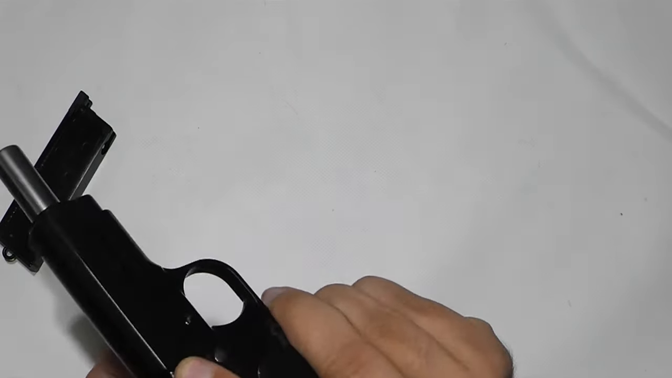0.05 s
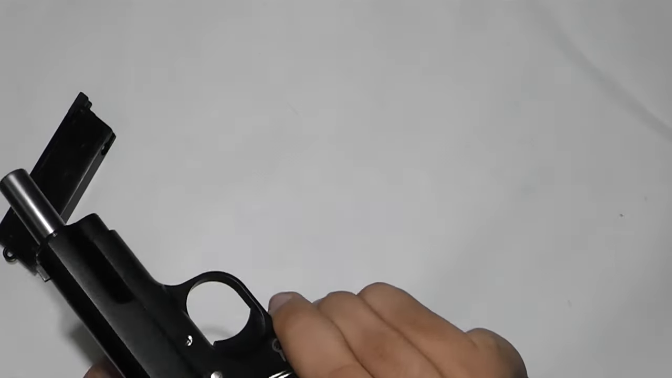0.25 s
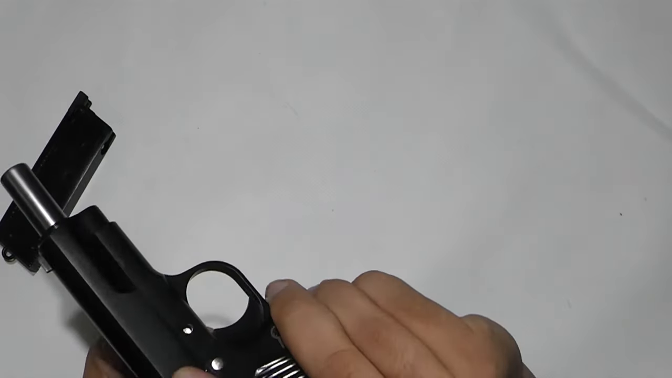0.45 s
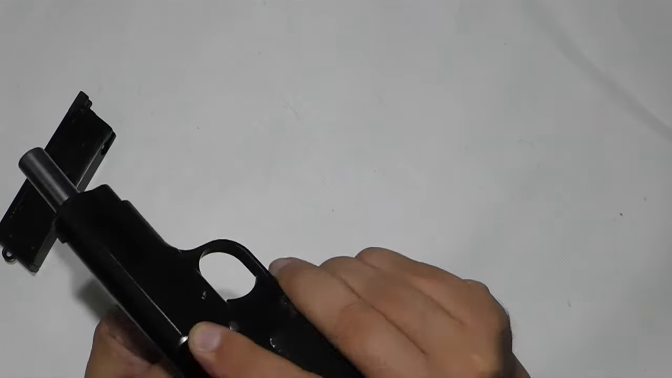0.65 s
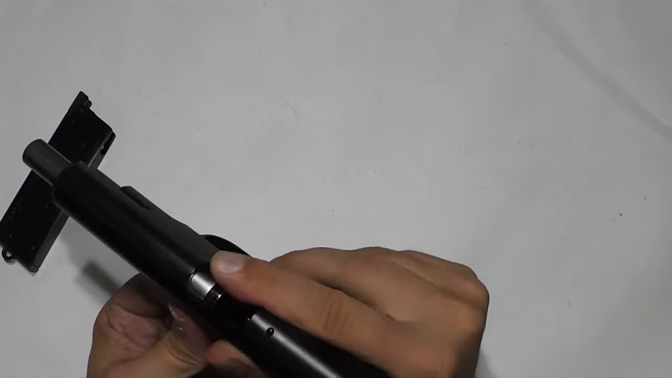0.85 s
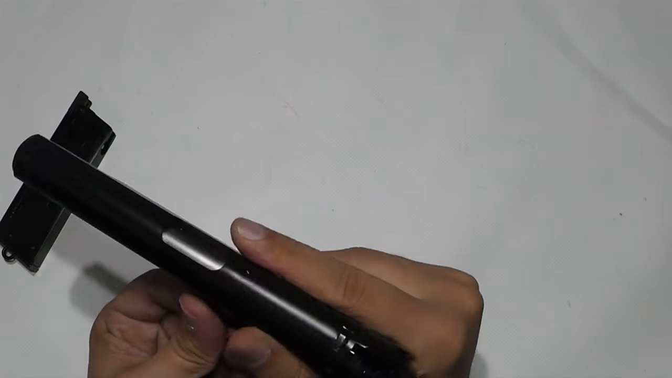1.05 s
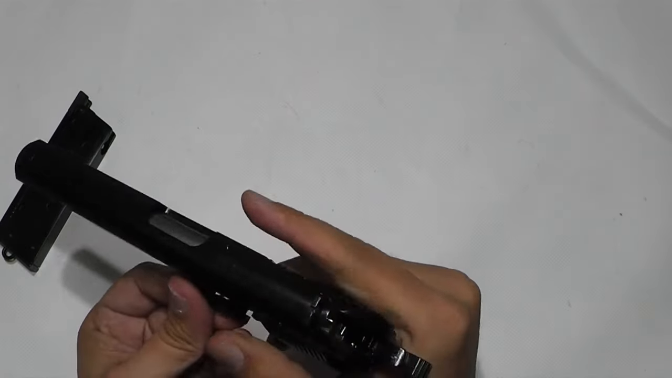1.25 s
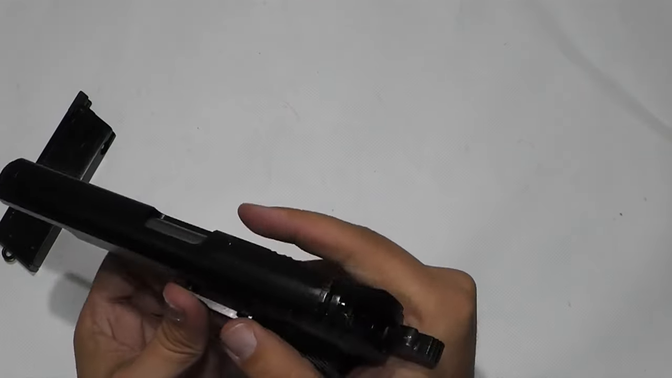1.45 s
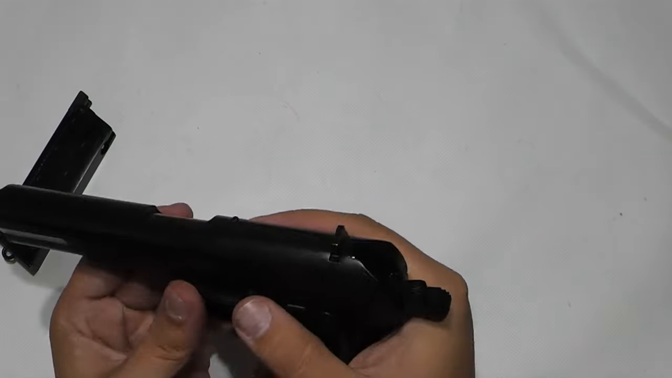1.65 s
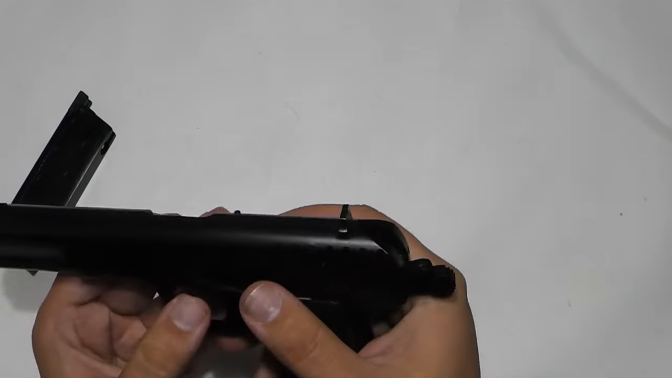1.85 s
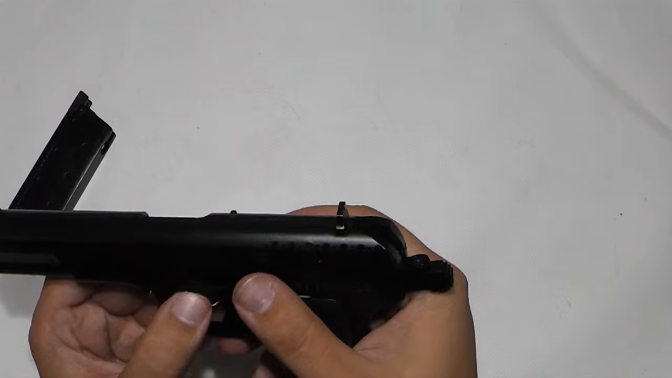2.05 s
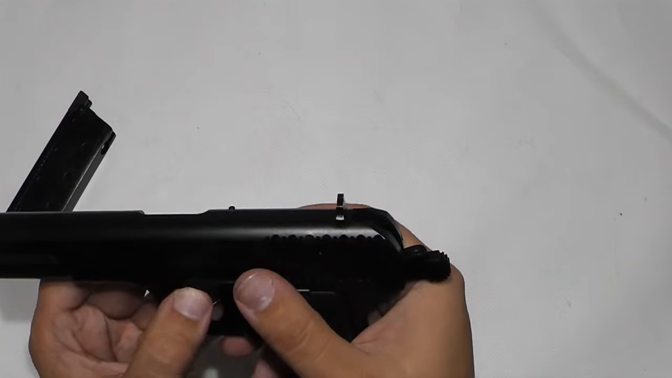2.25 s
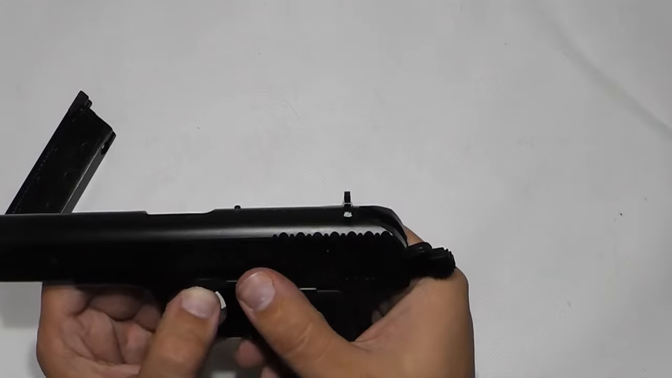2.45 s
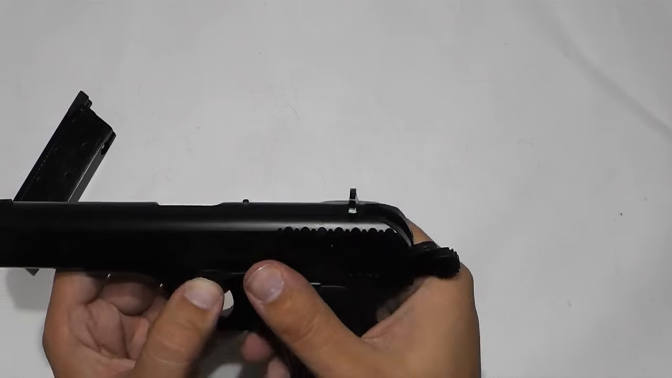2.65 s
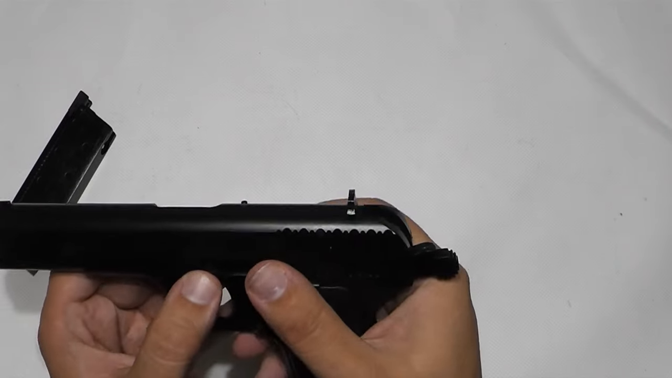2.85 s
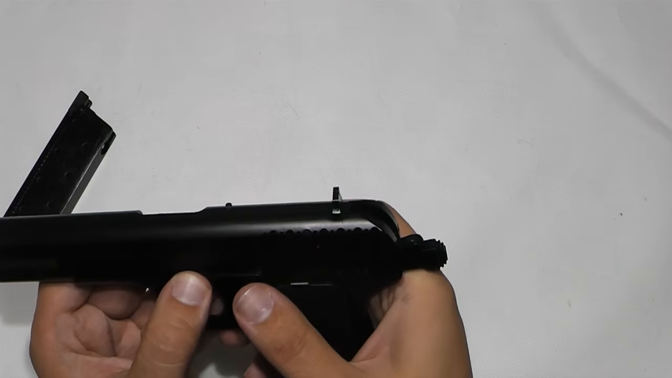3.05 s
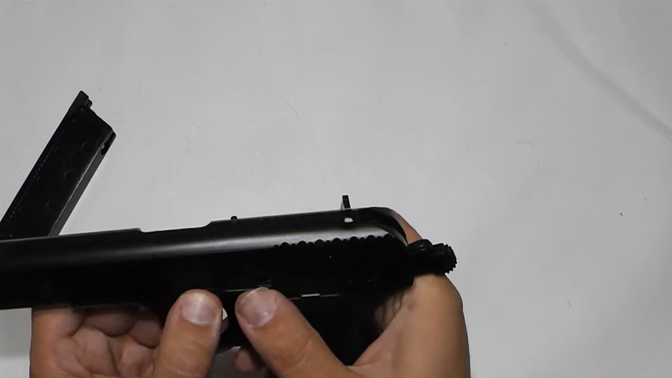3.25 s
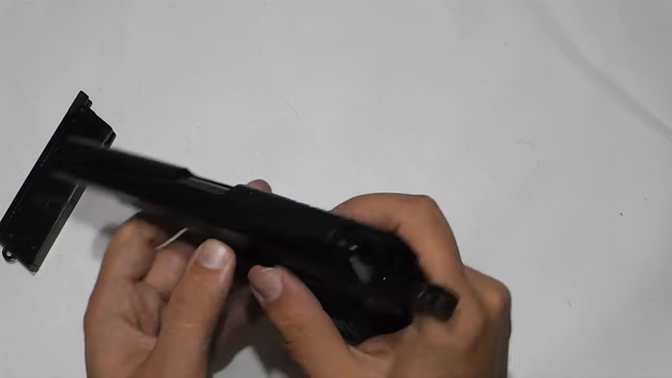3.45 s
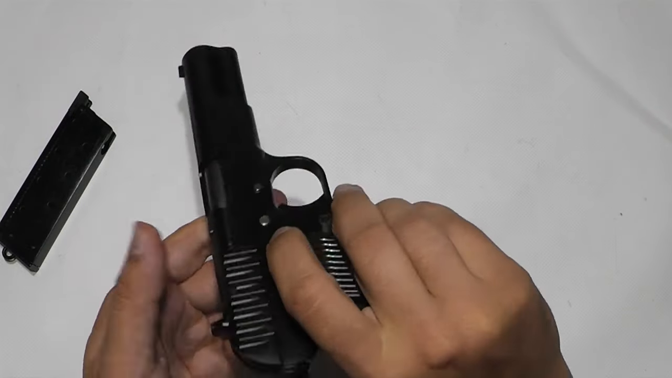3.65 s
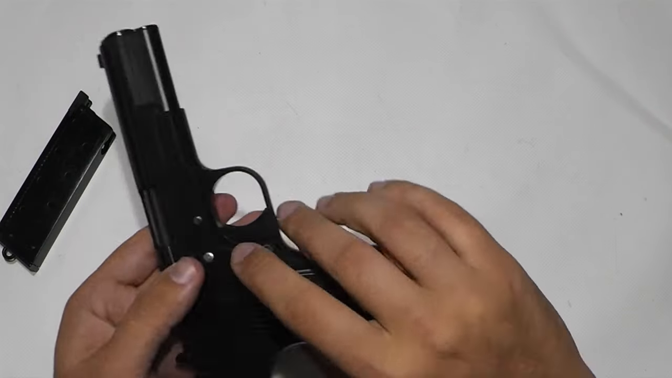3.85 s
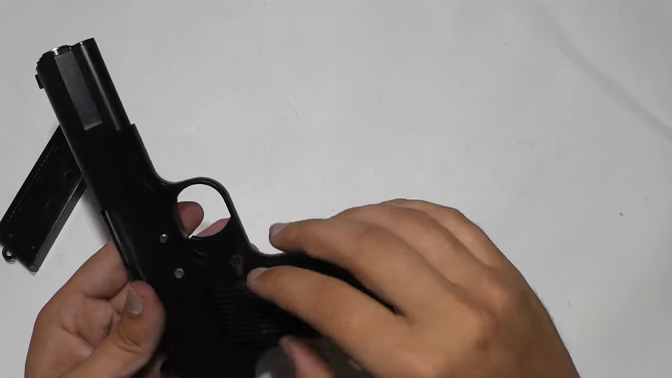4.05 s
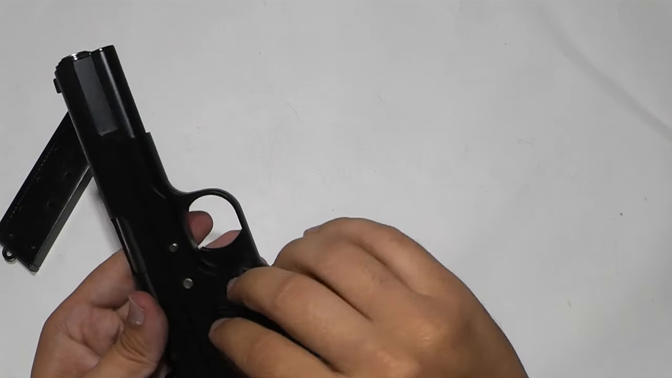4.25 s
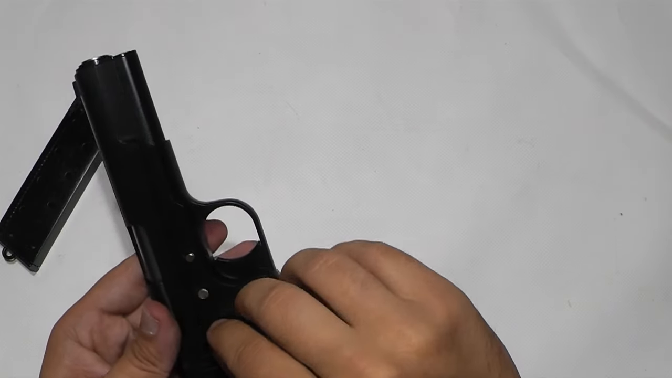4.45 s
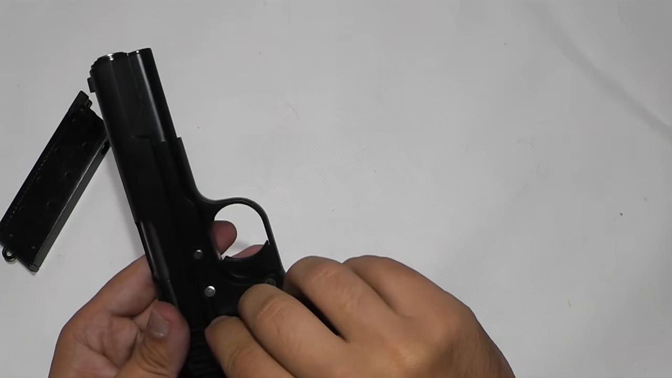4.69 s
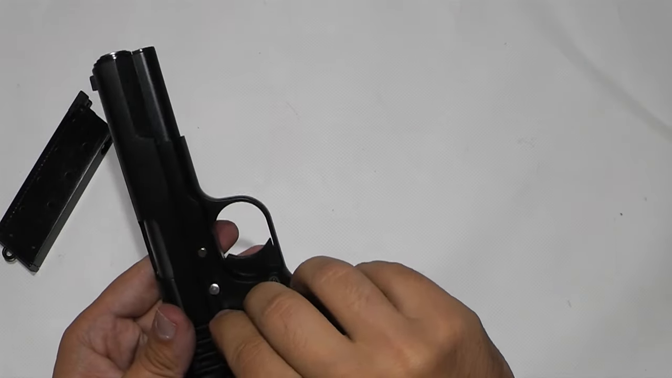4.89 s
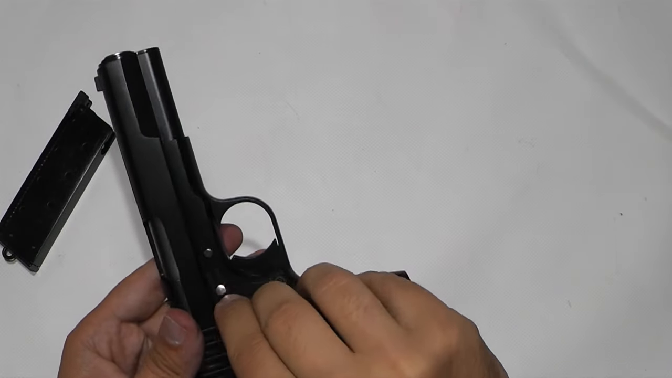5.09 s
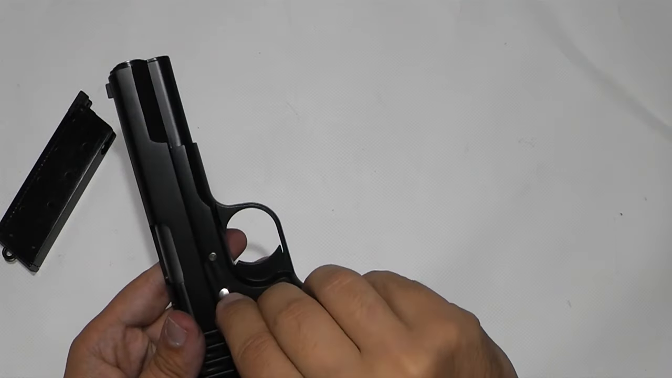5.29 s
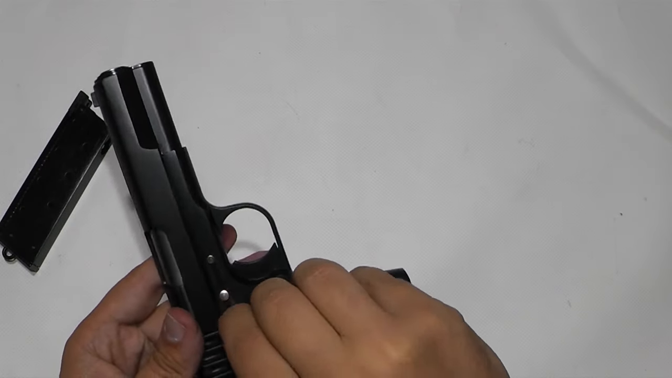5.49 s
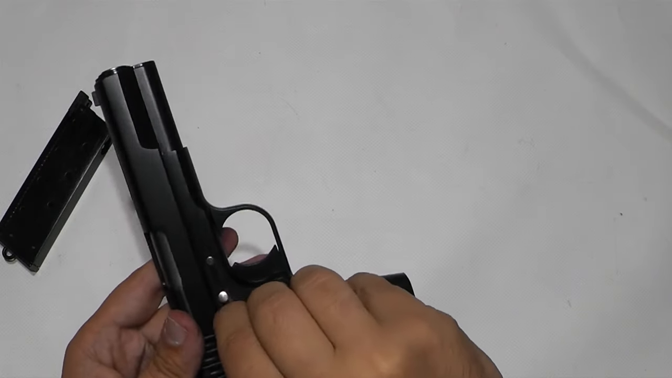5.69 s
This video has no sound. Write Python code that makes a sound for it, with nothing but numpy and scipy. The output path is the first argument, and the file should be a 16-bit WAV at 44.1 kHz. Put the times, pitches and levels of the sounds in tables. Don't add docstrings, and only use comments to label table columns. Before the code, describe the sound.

Hands work steel gun parts in a quiet small room, with ticks, a ringing table knock, two rattling slams, faint scrapes and a last snap.

```python
import sys
import numpy as np
from scipy import signal
from scipy.fft import rfft, irfft
from scipy.io import wavfile
from scipy.ndimage import uniform_filter1d

SR = 44100
rng = np.random.default_rng(int(sys.argv[2]) if len(sys.argv) > 2 else 0)


def transcribe(signal):
    frames = np.atleast_2d(signal).T
    limited = np.clip(frames, -1, 1)
    pcm = np.round(limited * 32767).astype(np.int16)
    wavfile.write(sys.argv[1], SR, pcm)


def volts_from_decibels(level):
    exponent = np.asarray(level, float) / 20
    return 10 ** exponent


N = 252693


def evened(x):
    return x / np.sqrt(np.mean(x ** 2) + 1e-20)


def peaked(x):
    return x / abs(x).max()


def read(points, hz):
    f, value = np.transpose(points)
    return np.interp(np.log(hz + 1), np.log(f + 1), value)


def add(mix, s, sound):
    part = mix[..., round(s * SR):][..., :sound.shape[-1]]
    part += sound[..., :part.shape[-1]]


def resonate(x, hz, width_hz):
    turn = np.exp(2j * np.pi * hz * np.arange(x.shape[-1]) / SR)
    r = np.exp(-np.pi * width_hz / SR)
    return 2 * (turn * signal.lfilter([1 - r], [1, -r], x / turn)).real


def ring(modes, shorten, size, apart):
    t = np.arange(size) / SR
    spread = rng.standard_normal((len(modes), 2, 1))
    out = np.zeros((2, size))
    for (hz, db, t60), v in zip(modes, spread):
        fading = volts_from_decibels(db + 0.83 * v - 60 * t / (t60 * shorten))
        out += fading * np.sin(2 * np.pi * hz * t + apart * v)
    return out * np.minimum(t / 0.00048, 1)


def shaken(colour, alike, size):
    a, b = rng.standard_normal((2, size))
    pair = np.array([a + alike * b, b + alike * a])
    return evened(irfft(rfft(pair) * volts_from_decibels(read(colour, np.fft.rfftfreq(size, 1 / SR))), size))


# pitch in Hz, likeness (1 is the same).
SAME = [(60, 0.94), (130, 0.98), (290, 0.38), (640, 0.015), (1400, 0.52), (3100, 0), (7000, 0.047)]


def hiss(colour, patchy_db, same=SAME, size=512):
    frames = N // (size // 4) + 5
    hz = np.fft.rfftfreq(size, 1 / SR)
    a, b, c, d, patches = rng.standard_normal((frames, len(hz), 5)).astype(np.float32).T
    patches = uniform_filter1d(patches, size=7, axis=0)
    patches = evened(uniform_filter1d(patches, size=8, axis=1))
    like = np.clip(read(same, hz), -1, 1)[:, None]
    left = a + 1j * b
    right = like * left + np.sqrt(1 - like ** 2) * (c + 1j * d)
    z = np.array([left, right]) * volts_from_decibels(read(colour, hz)[:, None] + patchy_db * patches)
    return evened(signal.istft(z, nperseg=size, noverlap=3 * size // 4)[1][:, :N])


# pitch in Hz, level in dB per Hz.
HUM = [(8.8, -37), (15, -10.5), (32, -9), (54, 2), (70, 3.5), (80, -8.5), (110, -4.5), (129, -20),
       (170, -23), (220, -50.5), (370, -120)]
# pitch in Hz, width in Hz, level in dB.
WHINES = [(1076, 1.4, -74), (7130, 13, -99), (8700, 20, -100.5)]
# pitch in Hz, level in dB per Hz.
AIR = [(2000, -34), (3400, -11.5), (5450, 7.5), (6410, -9), (7330, -5), (9180, -16), (11200, -16.5),
       (13000, -26.5)]


def room_noise():
    t = np.arange(N) / SR
    out = volts_from_decibels(-63) * hiss(HUM, 1.5, size=4096)
    for hz, width_hz, db in WHINES:
        waver = evened(resonate(rng.standard_normal(N), hz, width_hz))
        out += volts_from_decibels(db) * evened(np.sin(2 * np.pi * hz * t) + 0.5 * waver)
    return out + volts_from_decibels(-85.5) * hiss(AIR, 1.4, size=256)


# time in seconds, rustle
# level in dB.
RUSTLE = [(0.0, -77.5), (0.3, -81.5), (0.46, -65.5), (0.72, -68.5), (0.91, -69), (1.12, -75.5), (1.35, -75),
          (1.52, -88.5), (1.98, -79), (2.49, -87.5), (3.08, -82.5), (3.22, -72.5), (3.38, -83), (3.69, -76),
          (3.95, -78.5), (4.4, -89), (5.2, -85.5), (5.4, -80.5)]
# pitch in Hz, level in dB per Hz.
RUSTLE_COLOUR = [(2120, -42), (3600, -13), (4090, 1.5), (4890, -4.5), (5290, -2), (6090, -1), (7360, -6),
                 (10000, -4), (14200, -9.5), (15500, -14)]
# pitch in Hz, level in dB per Hz.
RUB_COLOUR = [(82, -32.5), (140, -18), (235, 0.5), (269, -5), (338, -4), (479, -6.5), (776, -5), (1100, -5),
              (1160, -4.5), (1520, -8.5), (1780, -6.5), (2220, -14), (2500, -37.5), (3250, -70.5),
              (5500, -120)]


def hands():
    t = np.arange(N) / SR
    busy_db = np.interp(t, *np.transpose(RUSTLE))
    flicker_db = 0.63 * evened(uniform_filter1d(rng.standard_normal(N), size=300))
    rustle = volts_from_decibels(busy_db + 1.9 + flicker_db) * hiss(RUSTLE_COLOUR, 1.3)
    sleeve_s, sleeve_width_s, sleeve_db = 4.44, 0.52, 4.5
    swell_db = sleeve_db * np.exp(-((t - sleeve_s) / sleeve_width_s) ** 2)
    rub_db = -65 + 0.18 * (busy_db + 74.5) + swell_db
    return rustle + volts_from_decibels(rub_db + 1.52) * hiss(RUB_COLOUR, 1.8, size=1024)


# pitch in Hz, time in seconds to fall by 60 dB.
ROOM = [(100, 0.042), (400, 0.089), (1200, 0.28), (3000, 0.23), (7000, 0.23), (14000, 0.11)]


def room(x):
    taps = np.zeros((2, SR // 2))
    at = np.arange(100, SR // 2 - 20, 20) + rng.integers(0, 20, (2, (SR // 2 - 101) // 20))
    np.put_along_axis(taps, at, rng.choice([-1., 1.], at.shape), 1)
    taps = taps + 1.4 * taps[::-1]
    hz, t, z = signal.stft(taps, SR, nperseg=256)
    fading = volts_from_decibels(-60 * t / read(ROOM, hz)[:, None])
    tail = signal.istft(z * fading, SR, nperseg=256)[1]
    return signal.fftconvolve(x, tail / np.linalg.norm(tail[0]), axes=1)[:, :N]


# start in seconds, end in seconds, first level in dB,
# last level in dB, body level in dB against the bright grit.
SCRAPES = [
    (1.096, 1.127, -73, -49, -4.5),
    (1.145, 1.167, -46, -38.5, -6),
    (1.167, 1.171, -36, -30, -12),
    (3.54, 4.12, -79, -82.5, -27),
    (5.505, 5.66, -73, -84, -17),
    (3.08, 3.074, -70, -50, -8.5),
    (5.19, 5.231, -70.5, -50.5, 7),
    (4.836, 4.874, -95, -79, -12),
    (4.893, 4.954, -78, -86, -10),
]


def scrapes(steel):
    out = np.zeros((2, N))
    for start, end, first_db, last_db, body_db in SCRAPES:
        t = np.arange(0, end - start + 0.01, 1 / SR)
        wide = steel[:, round(start * SR):][:, :len(t)]
        grit, a, b = rng.standard_normal((3, len(t)))
        grains = evened(volts_from_decibels(1.8 * evened(uniform_filter1d(grit, size=90))))
        bright = evened(0.52 * wide + resonate(wide, 8100, 3500))
        body = evened(resonate(resonate(a, 1200, 800), 1600, 820))
        body = body + 0.33 * evened(resonate(resonate(b, 520, 500), 520, 500))
        touching = np.clip(t / 0.002, 0, 1) * np.clip((end - start + 0.0026 - t) / 0.0024, 0, 1)
        level = volts_from_decibels(np.interp(t, [0, end - start], [first_db, last_db]))
        add(out, start, level * touching * grains * (bright + volts_from_decibels(body_db) * body))
    return out


def ticks(steel, contacts, steel_hz, width_hz, crack_t60, tail_db):
    out = np.zeros((2, N))
    t = np.arange(3000) / SR
    for s, db, body_db, body_hz, wide_db in contacts:
        wide = steel[:, round(s * SR):][:, :len(t)]
        shake = rng.standard_normal((3, len(t)))
        hard = min(volts_from_decibels(db + 21.5), 1.5)
        tail = wide * volts_from_decibels(tail_db - 60 * t / 0.096) * np.minimum(t * 500, 1)
        burst = wide + hard * np.diff(wide, n=2, prepend=0, append=0)
        burst = burst * volts_from_decibels(-60 * t / crack_t60) * np.minimum(t * 3000, 1)
        coloured = resonate(resonate(burst, steel_hz, width_hz), steel_hz, 1.5 * width_hz)
        crack = peaked(coloured) + volts_from_decibels(wide_db) * peaked(burst)
        push = shake[0] + 0.24 * shake[1:]
        push = push * volts_from_decibels(-60 * t / 0.044) * np.minimum(t / 0.0004, 1)
        for body_width_hz in (630, 1100, 1500):
            push = resonate(push, body_hz, body_width_hz)
        add(out, s, volts_from_decibels(db - 3.5) * (crack + tail + volts_from_decibels(body_db) * peaked(push)))
    return out


# time in seconds, peak level in dB, body level
# in dB against the peak, body pitch in Hz, wide crack level in dB against the peak.
PIN = [(0.0594, -37.5, -12, 1640, -7), (1.7495, -67, -20, 1400, -5.5), (1.7584, -54.5, -13.5, 1405, -3.5),
       (1.7675, -53, -2.5, 1410, -3.5), (3.4998, -46.5, 0, 1544, 4), (3.696, -41.5, 0.5, 1373, 7.5),
       (5.1912, -60.5, 16, 1310, -6), (5.467, -66.5, -15, 1291, 0), (.9348, -28, -22, 1308, -9),
       (5.5189, -43.5, -18, 1028, -17)]
LEVER = [(0.5265, -52, 16, 1150, -9), (1.7784, -46.5, -0.5, 1830, -7.5), (1.9354, -35, -2, 1490, 1),
         (2.1142, -45, 10.5, 1790, 0.5), (2.1191, -32.5, -11, 1900, 4)]
FRAME = [(0.2879, -18, 0, 1410, -23), (0.3007, -31, 1, 1530, 7.5), (0.5187, -46, 9, 1800, 13),
         (0.648, -35.5, 0.5, 1430, 11), (1.7733, -46.5, 9.5, 1780, 3.5), (2.832, -57.5, 6, 946, -14),
         (3.5214, -58.5, 12, 2070, -12), (3.795, -70, 12.5, 2470, -8), (3.9882, -59.5, -3, 1967, -9)]
SLIPS = [(0.0335, -40.5, -17, 1090, -25), (0.6818, -45.5, 1, 1310, 3), (0.8255, -51.5, 0, 1640, 2),
         (0.8811, -36, -7.5, 1228, -19), (1.043, -38, -16.5, 1880, -14), (1.1305, -30, 1.5, 1800, -14),
         (3.53, -57.5, -4, 1230, 9.5), (3.6574, -61, -3, 1210, -2), (3.758, -67.5, 5, 1090, 7),
         (4.0999, -56.5, -20, 929, -10), (5.5016, -45.5, 7.5, 1630, -3.5)]
CATCH = [(.912, -53, 7.5, 1310, 11), (1.1278, -33.5, 7, 1400, -6.5), (1.188, -25, 2, 1519, 3),
         (5.2085, -60.5, 12.5, 1870, -1), (5.2145, -65, 17, 1480, -7), (5.2285, -32, -6, 1405, -8),
         (5.2362, -14.5, -21, 1290, 0)]
SPRING = [(1.238, -35.5, 2, 2230, -8), (1.6697, -65, 15, 900, -25), (1.8882, -46.5, 3.5, 1520, -27),
          (2.1004, -48.5, 2, 1251, -30), (2.568, -43.5, 11, 1230, -12), (3.0605, -49.5, -14, 1500, -13)]


def small_parts(steel):
    return (ticks(steel, PIN, 10200, 2600, 0.008, -17)
            + ticks(steel, LEVER, 4100, 1500, 0.011, -22)
            + ticks(steel, FRAME, 6200, 3000, 0.01, -22)
            + ticks(steel, SLIPS, 9100, 2600, 0.045, -26.5)
            + ticks(steel, CATCH, 9300, 3200, 0.013, -26)
            + ticks(steel, SPRING, 4000, 1100, 0.012, -38))


# time in seconds, level in dB.
KNOCKS = [
    (0.2783, -41.5),
    (0.2862, -23.5),
    (0.2945, -28.5),
]
# pitch in Hz, level in dB, time in seconds to fall by 60 dB.
TABLE = [(157, -38, 0.36), (354.6, -9, 0.12), (598, -21, 0.16), (565, -7.5, 0.03), (750, -9.5, 0.071),
         (786, -22, 0.12), (923, -12, 0.1), (1078, -17, 0.11), (1480, -38, 0.13), (1379, -6.5, 0.044),
         (1830, -25, 0.051), (1990, -41, 0.09), (2100, -51, 0.16)]
# pitch in Hz, level in dB per Hz.
THUD = [(120, -32), (200, -3), (322, 4.5), (755, 1), (1260, -36), (1500, -22), (1640, -24), (2060, -26),
        (2640, -28), (4000, -23.5), (5200, -33), (8800, -120)]
# pitch in Hz, level in dB per Hz.
BOOM = [(30, -4), (60, -12), (115, 3), (200, -16.5), (460, -11), (800, -19.5), (1500, -32), (3000, -53)]


def knocks():
    out = np.zeros((2, N))
    t = np.arange(30000) / SR
    board = peaked(ring(TABLE, 0.87, size=12000, apart=0.21))
    for s, db in KNOCKS:
        add(out, s, volts_from_decibels(db + 4) * board)
    thud_t60, shudder_t60 = 0.089, 0.58
    thud = shaken(THUD, 0.39, size=len(t)) * volts_from_decibels(-24.5 - 60 * t / thud_t60) * np.minimum(t * 2000, 1)
    shudder = shaken(BOOM, 0.57, size=len(t)) * volts_from_decibels(-40 - 60 * t / shudder_t60)
    add(out, KNOCKS[1][0], thud + shudder * np.minimum(t / 0.0034, 1))
    return out


# time in seconds, blow level in dB, thump level in dB, clang level in dB.
SLAMS = [
    (1.1711, -19, -26, -24.5),
    (3.077, -18.5, -39, -23),
]
# pitch in Hz, level in dB per Hz.
CLANGS = [
    [(120, -33.5), (200, -10), (267, -15.5), (765, -3.5), (1410, -3.5), (1540, -2.5), (2600, -12),
     (3380, -42), (5720, -120)],
    [(65, -37), (110, -6.5), (250, -6.5), (420, -1.5), (800, -6), (1210, -3.5), (1640, -5), (1790, 3.5),
     (2600, -23.5), (3380, -49), (5720, -120)],
]
# pitch in Hz, level in dB, time in seconds to fall by 60 dB.
THUMP = [(47, 2, 0.15), (81.5, 3.5, 0.14), (130, 4, .1), (165, -10.5, 0.083)]


def slams(steel):
    out = np.zeros((2, N))
    t = np.arange(8192) / SR
    rattle_s, rattle_t60, clang_t60 = 0.011, 0.15, 0.06
    start = np.minimum(t / 0.002, 1)
    later = np.maximum(t - rattle_s, 0)
    for (s, db, thump_db, clang_db), colour in zip(SLAMS, CLANGS):
        chatter = evened(volts_from_decibels(0.43 * evened(uniform_filter1d(rng.standard_normal(len(t)), size=40))))
        crash = steel[:, round(s * SR):][:, :len(t)] * chatter * volts_from_decibels(db - 60 * later / rattle_t60)
        clang = shaken(colour, 0.3, size=len(t)) * volts_from_decibels(clang_db - 60 * later / clang_t60)
        thump = ring(THUMP, 0.46, size=len(t), apart=0.93) * volts_from_decibels(thump_db) * np.minimum(t / 0.0036, 1)
        add(out, s, (crash + clang) * start + thump)
    return out


# pitch in Hz, level in dB per Hz.
SLAM_COLOUR = [(1290, -39.5), (2200, -10), (2480, -19), (2630, -10), (3330, -6), (5290, 2.5), (9950, 3.5),
               (12300, -3.5), (13900, -4.5), (15800, -10.5), (16500, -34.5)]


def scene():
    steel = hiss(SLAM_COLOUR, 0.26, same=[(3000, 0.67), (8000, 0.93), (14000, 0.14)], size=256)
    near = small_parts(steel) + slams(steel) + knocks() + scrapes(steel)
    return near + volts_from_decibels(-12.5) * room(near) + hands() + room_noise()


def band_limit(x):
    return signal.sosfilt(signal.butter(12, 16810, fs=SR, output="sos"), x)


# pitch in Hz, level in dB.
DROPPED = [(2300, -150), (2700, -121), (3500, -121), (3900, -150), (11700, -150), (12000, -116),
           (15300, -110), (16200, -85)]


def record(dry):
    hz, t, z = signal.stft(dry, SR, nperseg=2048)
    power = uniform_filter1d((abs(z) ** 2).mean(0), size=16, axis=0)
    power = uniform_filter1d(power, size=3, axis=1)
    over_db = 10 * np.log10(power + 1e-30) - read(DROPPED, hz)[:, None]
    kept = np.clip(over_db / 2.1, 0, 1)
    mix = signal.istft(z * kept, SR, nperseg=2048)[1][:, :N]
    return band_limit(mix)


dry = scene()
out = record(dry)
transcribe(out)
```